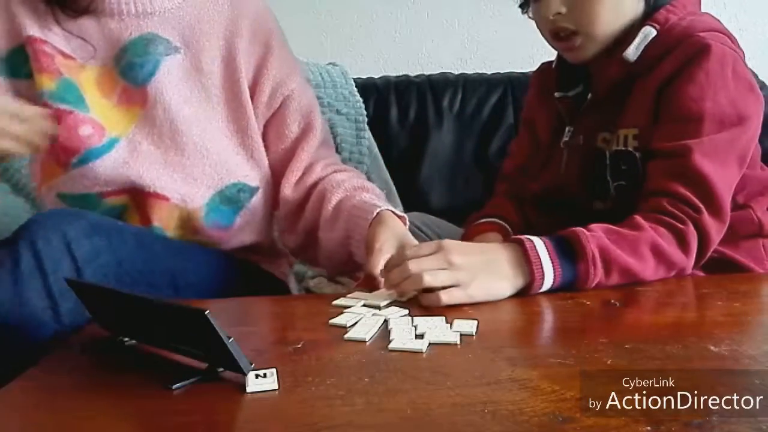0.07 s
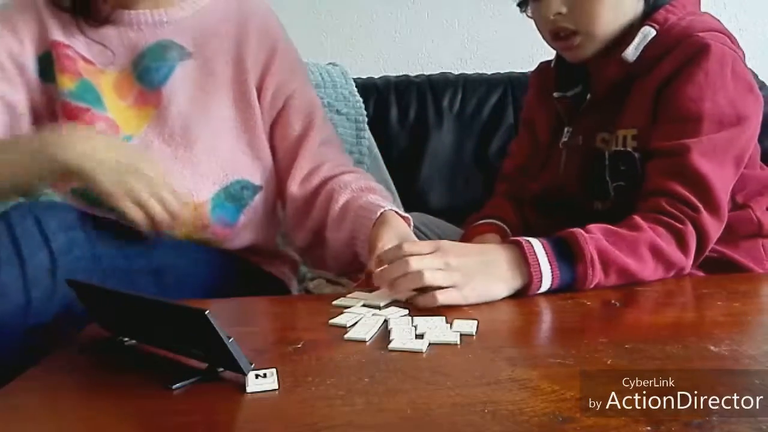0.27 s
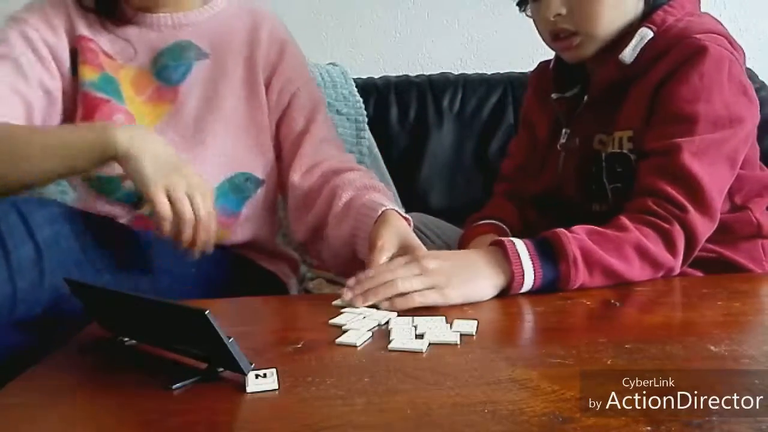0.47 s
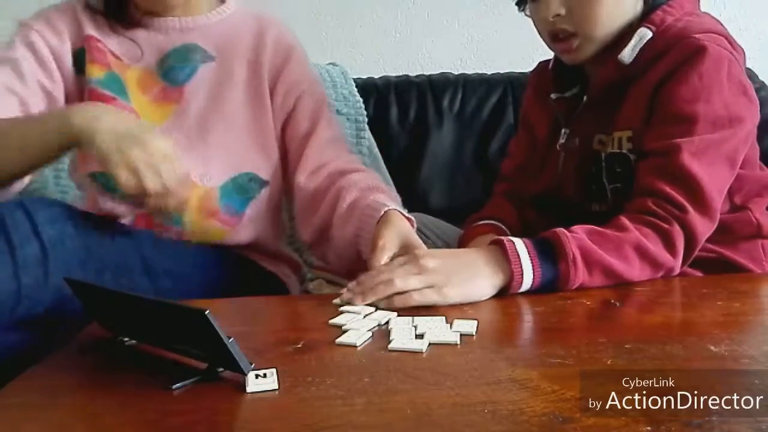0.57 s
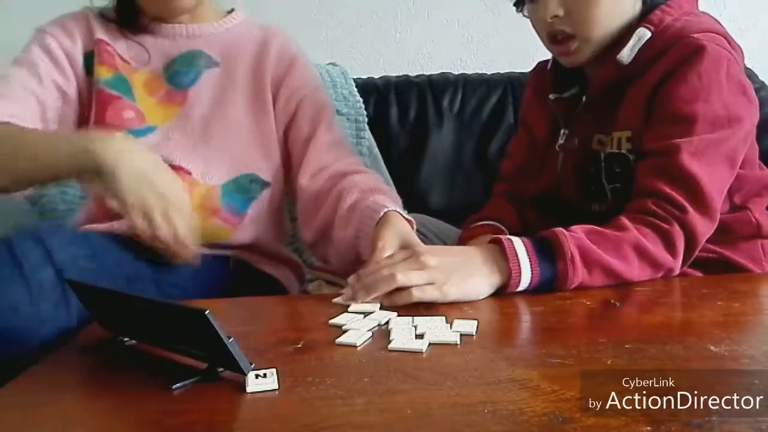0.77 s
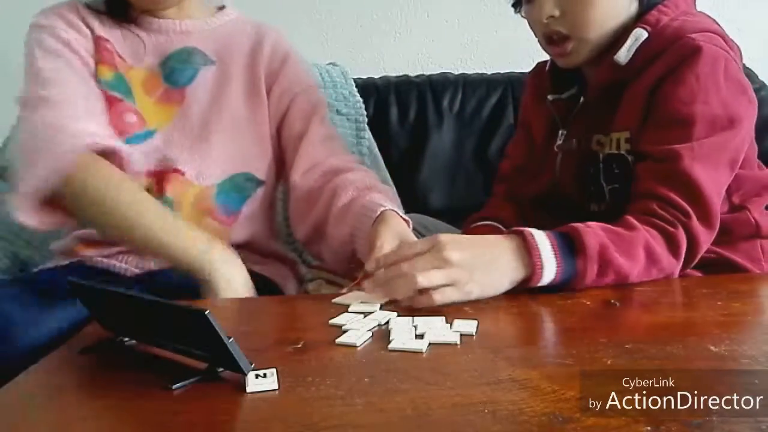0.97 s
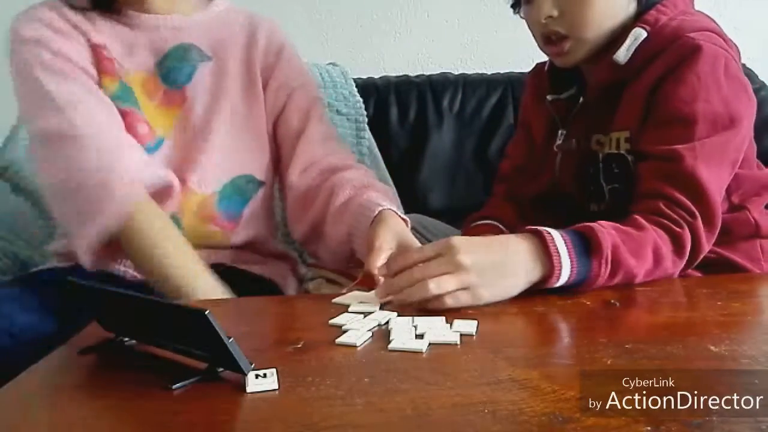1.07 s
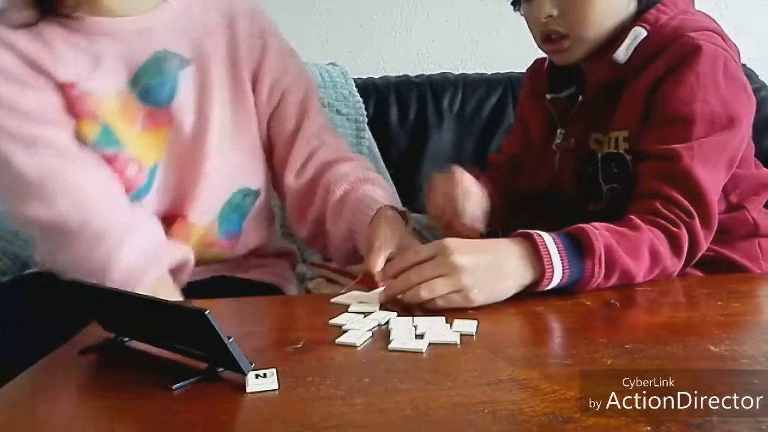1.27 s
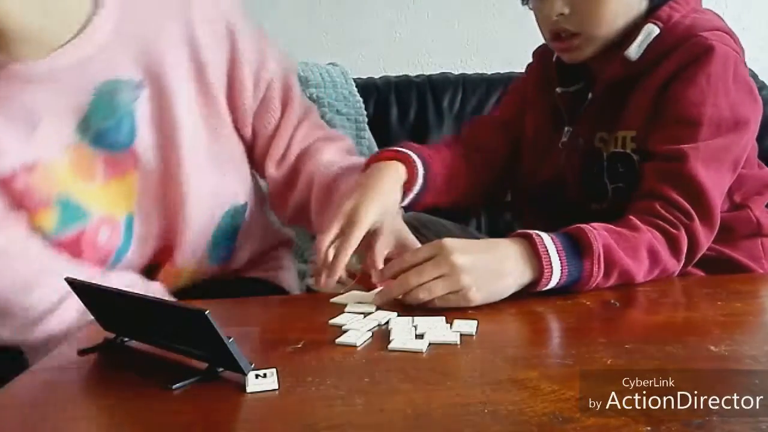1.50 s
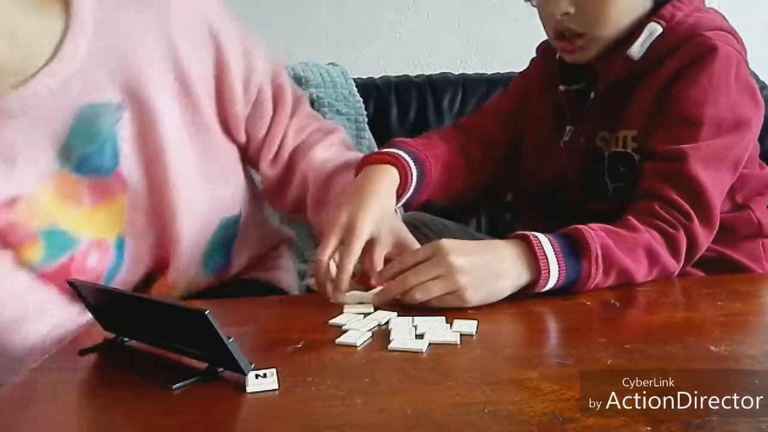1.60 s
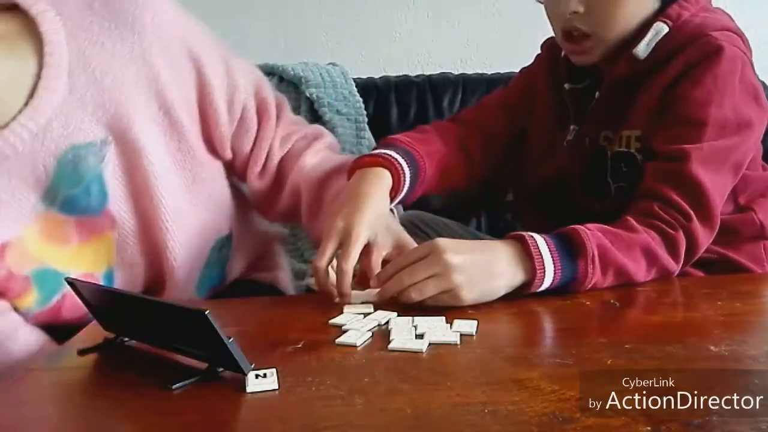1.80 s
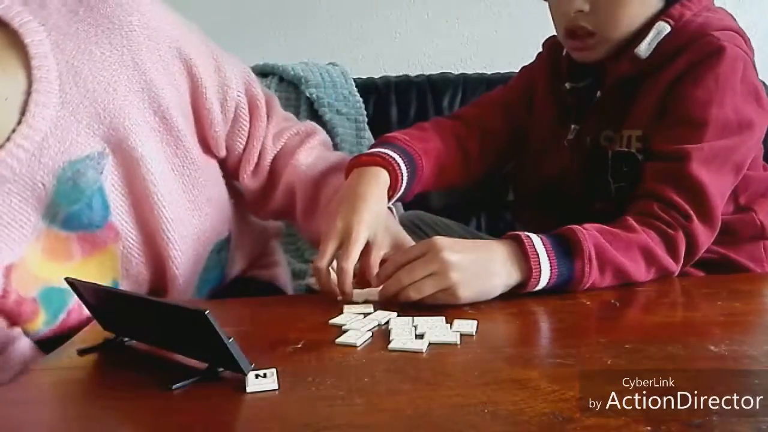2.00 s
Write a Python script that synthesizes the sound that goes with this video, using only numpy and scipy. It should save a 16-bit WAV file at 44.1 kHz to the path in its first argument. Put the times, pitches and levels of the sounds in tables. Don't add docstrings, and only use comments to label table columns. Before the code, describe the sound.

A plastic game tile is knocked down and slid on a wooden table: after a faint tick and sleeve rub at 0.1 s, sharp clacks and bright stuttering scrape run from 0.25 to 0.45 s with a short woody knock, and a last click at 0.5. Soft cloth rustles follow at 0.65-0.95, then from 1.1 to 2 quiet hand thuds, rubs and small tile ticks. Close stereo, small quiet room, faint hiss.

```python
import sys
import numpy as np
from scipy import signal
from scipy.fft import rfft, irfft
from scipy.io import wavfile
from scipy.ndimage import uniform_filter1d

SR = 44100
rng = np.random.default_rng(int(sys.argv[2]) if len(sys.argv) > 2 else 0)


def decibels_to_gain(level_db):
    exponent = np.asarray(level_db, float) / 20
    return 10 ** exponent


def waveform_to_disk(signal):
    frames = np.transpose(np.atleast_2d(signal))
    scaled = np.clip(frames, -1, 1) * 32767
    samples = np.round(scaled).astype(np.int16)
    wavfile.write(sys.argv[1], SR, samples)


N = 90404
T = np.arange(N) / SR


def unit(x):
    return x / np.sqrt(np.mean(x ** 2))


def butter(x, order, hz, kind="low"):
    return signal.sosfilt(signal.butter(order, hz, kind, fs=SR, output="sos"), x)


def smooth_low(x, order, hz):
    return signal.sosfiltfilt(signal.butter(order, hz, fs=SR, output="sos"), x)


def colour(x, points):
    hz, db = np.array(points).T
    bins_hz = np.arange(1, 1026) * SR / 2048
    cepstrum = irfft(np.interp(np.log(bins_hz), np.log(hz), db) * np.log(10) / 20)
    cepstrum[1:1024] *= 2
    cepstrum[1025:] = 0
    impulse = irfft(np.exp(rfft(cepstrum)))[:1024]
    return signal.fftconvolve(x, np.atleast_2d(impulse), axes=-1)[:, :N]


def mode(x, hz, t60_s):
    pole = np.exp((2j * np.pi * hz - np.log(1000) / t60_s) / SR)
    return signal.lfilter([1], [1, -pole], x).imag


def side(pan_db):
    return decibels_to_gain(np.array([[pan_db], [-pan_db]]) / 2)


def ports(x, pan_db):
    lag_s, size = 7.5e-5, 2 ** 17
    bins_hz = np.arange(size // 2 + 1) * SR / size
    late = irfft(rfft(x, size) * np.exp(-2j * np.pi * bins_hz * lag_s))[:N]
    return np.array([late, x]) * side(pan_db)


def grains(per_s, spread_db, channels):
    when, sign, size = rng.random((3, channels, N))
    return unit((when < per_s / SR) * np.sign(sign - .5) * decibels_to_gain(-spread_db * np.log(1 - size)))


def curve(rows, index):
    return np.interp(T, [r[0] for r in rows], [r[index] for r in rows], -120, -120)


def burst(s, length_s, noise):
    peak_s = s + length_s
    return noise * np.exp(-np.abs(T - peak_s) / np.where(T < peak_s, length_s / 3, length_s))


def tile():
    # (time [s], peak [dB], left-right [dB], length [s])
    knocks = [(0.2465, -21.5, -8.5, 0.0025), (0.2481, -31.5, -7, 0.0025), (0.265, -32, 1, 0.0045),
              (0.2909, -22, -6.5, 0.0016), (0.3033, -23.5, -1, 0.0017), (0.3083, -29.5, 9, 0.0019),
              (0.3165, -36, 11, 0.0016), (0.328, -28, -7, 0.0017), (0.3363, -23.5, -2, 0.0029),
              (0.349, -33, 0, 0.0022), (0.358, -28, 6, 0.001), (0.3751, -21.5, 1.7, 0.0018),
              (0.384, -22, 1.5, 0.0012), (0.3926, -27, -3.5, 0.003), (0.407, -32, -4, 0.0023),
              (0.416, -29, -4.5, 0.0018), (0.4405, -33, -2.5, 0.003), (0.4885, -52, -4, 0.0008),
              (0.502, -49, 3, 0.0014)]
    # (time [s], pressure [dB], drag on the wood [dB])
    slide = [(.19, -62.5, -71), (.247, -69, -84), (.255, -43, -52), (.285, -39.5, -54.5), (.32, -32, -46),
             (.4, -33, -60), (.425, -37, -62), (.46, -39.5, -62.5), (.53, -52.5, -62.5), (.6, -88, -78.5)]
    # (frequency [Hz], level [dB], t60 [s], left-right [dB])
    tile_modes = [(3720, -15, 0.042, 11.5), (4270, -13.5, 0.017, 11.5), (5447, -0.5, 0.055, 10),
                  (6458, 6.5, 0.065, 6), (7360, -15, 0.049, -17.5), (9700, -4.5, 0.0018, -18),
                  (13050, -4.5, 0.0096, -2), (13170, -4, 0.014, -7)]
    # (frequency [Hz], level [dB])
    scrape = [(1500, -71.5), (3000, -18.5), (4500, -8), (6300, 5.5), (9000, -5), (11800, -21.5), (13100, 0),
              (13900, -27.5), (15000, -28.5)]
    # (frequency [Hz], level [dB])
    drag = [(150, -14), (500, -0.5), (1400, 11), (3000, 6.5), (5000, -23)]
    stutter_per_s, stutter_db = 200, 1.5
    chatter_db, scrape_db, knock_db, crack_db = 0.5, 0.5, 6.5, 2.5
    t60_cap_s, flips_hz = .024, 10000
    dulls_db_per_db = 5.8

    hold = int(SR / stutter_per_s)
    steps = np.repeat(rng.standard_normal(N // 50), hold)[:N]
    stutter = decibels_to_gain(stutter_db * uniform_filter1d(steps, hold // 2))
    chatter = grains(per_s=4500, spread_db=2.5, channels=3)
    noise = ports(rng.standard_normal(N), 0)

    def ring(x):
        out = 0
        for hz, db, t60_s, pan_db in tile_modes:
            lobes = np.sign([[1], [flips_hz - hz]])
            out = out + decibels_to_gain(db) * side(pan_db) * lobes * mode(x, hz, min(t60_s, t60_cap_s))
        return out

    hits = sum(decibels_to_gain(db) * side(pan_db) * burst(s, length_s, noise) for s, db, pan_db, length_s in knocks)

    rough = ports(chatter[0], 0) + 1.15 * chatter[1:]
    pressure_db = curve(slide, index=1)
    slid = rough * decibels_to_gain(pressure_db) * stutter
    dull = smooth_low(slid, 2, 9000)
    slid = dull + (slid - dull) * decibels_to_gain(dulls_db_per_db * (pressure_db - pressure_db.max()))

    rings = ring(slid * decibels_to_gain(chatter_db) + hits * decibels_to_gain(knock_db)) / np.std(ring(noise))
    rings = butter(rings, 3, 3000, "high")
    broad = colour(slid * decibels_to_gain(scrape_db) + hits * decibels_to_gain(crack_db), scrape) / np.std(colour(noise, scrape))
    wood = unit(colour(rough, drag)) * decibels_to_gain(curve(slide, index=2)) * stutter[::-1]
    return rings + broad + wood


def table():
    # (frequency [Hz], level [dB], t60 [s], left-right unlikeness [ratio])
    table_modes = [(166.3, -17, 0.17, -0.14), (207, 0.5, 0.11, -0.18), (300, -5, 0.042, 0.27),
                   (504, -11.5, 0.037, 1.1), (820, -19, 0.0065, -0.7), (1340, -6, 0.022, 0.018)]
    # (time [s], peak [dB])
    pushes = [
        (.248, -22),
        (.251, -29.5),
        (.27, -27.5),
        (.294, -25),
        (.311, -28),
        (0.33, -35),
    ]
    push_db, hum_db, hum_end_s, hum_fade_s = -15, -53.5, 0.448, 0.021
    x = np.zeros(N)
    for s, db in pushes:
        x[int(s * SR)] = decibels_to_gain(db + push_db)
    hum = unit(mode(mode(rng.standard_normal(N), 212.5, 0.12), 272, 0.011))
    hum = hum * np.clip(np.minimum(T - pushes[0][0], hum_end_s - T) / hum_fade_s, 0, 1)
    out = decibels_to_gain(hum_db) * hum
    for hz, db, t60_s, unlike in table_modes:
        out = out + decibels_to_gain(db) * (1 + unlike * np.array([[1], [-1]])) * mode(x, hz, t60_s)
    return out


def ticks():
    # (time [s], peak [dB], frequency [Hz], t60 [s])
    tick_events = [(0.248, -39, 817, 0.0037), (.097, -41.5, 6960, 0.016), (0.096, -50.5, 4440, 0.0094),
                   (.111, -50, 6270, 0.023), (0.605, -61.5, 1845, 0.04), (1.125, -54, 1260, 0.028),
                   (1.366, -53.5, 1630, 0.013), (1.365, -62.5, 2900, 0.0091), (1.384, -66, 852, 0.09),
                   (1.512, -58, 1450, 0.031), (1.637, -43.5, 7190, 0.017), (1.638, -42.5, 12300, 0.0061),
                   (1.703, -43, 1160, 0.019), (1.713, -50.5, 1300, 0.01), (1.771, -42, 6290, 0.02),
                   (1.772, -48, 5440, 0.021), (1.771, -52.5, 3640, 0.016), (1.771, -51.5, 2456, 0.02),
                   (1.783, -65.5, 6000, 0.011), (0.4957, -37, 6330, 0.017), (1.868, -46.5, 1360, 0.0079),
                   (1.949, -55, 1180, 0.039), (2.014, -49, 4850, 0.0035), (2.044, -45, 930, 0.0063)]
    crack_db = 3.5
    noise, out = rng.standard_normal(N), 0
    for s, db, hz, t60_s in tick_events:
        u = np.clip(T - s, 0, None)
        ring = np.sin(2 * np.pi * hz * u) * decibels_to_gain(-60 * u / t60_s) * (1 - np.exp(-u / 0.0024)) * 2
        crack = mode(mode(burst(s, 0.0014, noise), hz, 8 / hz), hz, 8 / hz)
        crack = np.gradient(np.gradient(crack)) * 0.11 * np.sqrt(SR / hz) * 0.61
        out = out + decibels_to_gain(db) * (ring + decibels_to_gain(crack_db) * crack)
    return np.array([np.roll(out, 1), out])


def scuffs():
    # (start [s], length [s], level [dB], frequency [Hz], width [Hz])
    scuff_events = [(.088, 0.025, -70.5, 1760, 250), (.09, 0.048, -71, 1110, 304),
                    (0.131, 0.024, -66, 700, 200), (.148, 0.015, -60, 1430, 790),
                    (0.149, .008, -67, 3600, 500), (0.155, 0.041, -58.5, 520, 197),
                    (.178, 0.024, -57.5, 526, 297), (0.176, 0.014, -56, 1170, 250),
                    (0.179, 0.027, -67, 2000, 350), (.267, 0.011, -40.5, 1520, 899),
                    (0.298, 0.029, -59, 646, 500), (0.481, 0.031, -63, 268, 147),
                    (0.4976, 0.0035, -34, 5160, 2400), (0.69, 0.0073, -55.5, 4330, 2440),
                    (0.736, 0.21, -62.5, 1320, 700), (0.346, 0.094, -55.5, 1460, 500),
                    (0.246, 0.012, -46, 1460, 2000), (.298, 0.017, -45.5, 1700, 1500),
                    (1.118, .03, -65, 686, 503), (1.772, 0.0059, -53.5, 2640, 3000),
                    (1.868, 0.0053, -62.5, 1500, 1200), (2.04, 0.01, -66, 1800, 1500),
                    (1.509, 0.1, -67, 550, 118), (1.647, 0.098, -64, 290, 119), (1.86, .06, -64, 1440, 600),
                    (1.915, 0.053, -74, 2450, 604), (1.95, 0.02, -63, 1500, 905),
                    (1.964, 0.087, -62, 580, 235), (1.978, 0.039, -64, 1300, 350),
                    (1.993, 0.028, -64, 1830, 300), (1.996, 0.027, -65.5, 2730, 400)]
    g = grains(per_s=3000, spread_db=4.9, channels=3)
    rough = g[0] + 0.7 * g[1:]
    out = np.zeros((2, N))
    for s, length_s, db, hz, width_hz in scuff_events:
        a, b = int(s * SR), min(int((s + length_s) * SR), N)
        t60_s = 2.2 / width_hz
        x = np.diff(rough[:, a - 2001:b])
        rung = mode(mode(x, hz, t60_s), hz, t60_s)[:, 2000:]
        out[:, a:b] += decibels_to_gain(db) * unit(rung) * np.sin(np.pi * np.linspace(0, 1, b - a) ** 0.62)
    return out


def rubs():
    # (start [s], rise [s], hold [s], fall [s], level [dB])
    rub_events = [
        (0.083, 0.0047, 0.0095, 0.029, -62.5),
        (0.127, 0.024, 0.14, 0.033, -61),
        (0.637, 0.088, 0.047, 0.093, -55),
        (0.741, 0.025, 0.12, 0.068, -57),
        (1.021, 0.059, 0.072, 0.094, -62),
        (1.344, 0.0092, 0.031, 0.1, -69.5),
        (1.494, 0.022, 0.037, 0.2, -53),
        (1.828, 0.062, 0.13, 0.026, -78),
    ]
    # (tilt [dB], left-right [dB])
    rub_colours = [(-6.5, 6), (-5.5, 1.5), (0, 1.5), (-6, 6), (-2.5, 5), (-4, 1.5), (-1.5, 0.5), (-14.5, 3)]
    # (frequency [Hz], level [dB])
    cloth_spectrum = [(200, -40), (500, -15), (1300, -5.5), (2200, -6.5), (5200, -0.5), (8500, -8),
                      (10500, -13.5), (13000, -61)]
    # (frequency [Hz], level [dB], t60 [s])
    rub_modes = [(1400, -7, .03), (2300, -9, .02), (2950, -7, .025), (4700, -7, .02), (6000, -7, .025)]
    range_db, hands_on_tiles_s = 19, 1.3
    bounce_s, bounce_db = 0.00014, -15

    g = grains(per_s=9000, spread_db=3, channels=3)
    cloth = unit(colour(ports(g[0], 0) + 3.9 * g[1:], cloth_spectrum))
    cloth = cloth + decibels_to_gain(bounce_db) * np.array([np.interp(T - bounce_s, T, c) for c in cloth])
    rung = sum(decibels_to_gain(db) * unit(mode(mode(cloth, hz, t60_s), hz, t60_s / 2)) for hz, db, t60_s in rub_modes)
    cloth = cloth + (T > hands_on_tiles_s) * rung
    low = smooth_low(cloth, 1, 2600)
    out = 0
    for (s, rise_s, hold_s, fall_s, db), (tilt_db, pan_db) in zip(rub_events, rub_colours):
        end_s = s + rise_s + hold_s + fall_s
        shape = np.clip(np.minimum((T - s) / rise_s, (end_s - T) / fall_s), -2, 1)
        tilted = low * decibels_to_gain(-tilt_db) + (cloth - low) * decibels_to_gain(tilt_db)
        out = out + decibels_to_gain(db + range_db * (shape - 1)) * side(pan_db) * tilted
    return out


def thuds():
    # (time [s], peak [dB], frequency [Hz], length [s])
    thud_events = [(0.705, -62.5, 324, 0.015), (1.122, -54, 100, 0.029), (1.126, -55, 234, 0.014),
                   (1.368, -53.5, 123, 0.026), (1.391, -54, 248, 0.015), (1.405, -48.5, 110, 0.023),
                   (1.517, -52.5, 96.4, 0.044), (1.555, -56, 100.7, 0.12), (1.552, -52, 210, 0.01),
                   (1.6, -48.5, 181, 0.017), (1.646, -60, 285, 0.018), (1.667, -60.5, 95, 0.091),
                   (1.726, -56, 140, 0.02), (1.786, -49, 102, 0.026), (1.868, -50.5, 111.5, 0.044),
                   (1.876, -56, 204, 0.018), (1.907, -52, 114.6, 0.052), (1.971, -52.5, 171, 0.019),
                   (1.99, -58, 70.3, 0.077)]
    roughness = 0.25
    skin = unit(butter(rng.standard_normal((2, N)), 2, [60, 400], "band"))
    swings = 0
    for s, db, hz, length_s in thud_events:
        v = np.clip((T - s) / length_s, 0, 1)
        swings = swings + decibels_to_gain(db) * np.sin(2 * np.pi * hz * v * length_s) * np.sin(np.pi * np.sqrt(v))
    return (1 + roughness * (skin + skin[0]) / 2) * swings


def air():
    # (frequency [Hz], level [dB])
    air_spectrum = [(18, -45), (30, -38), (92, -2), (563, -13), (641, -13), (2170, -15.5), (2410, -17),
                    (7160, -15.5), (14800, -22)]
    # (frequency [Hz], level [dB])
    whines = [(6958, -80.5), (7016, -83.5)]
    air_db, alike_hz = -68.5, 324
    n = rng.standard_normal((3, N))
    low = butter(n[0], 2, alike_hz)
    high = butter(n[1:], 2, alike_hz, "high")
    whine = sum(decibels_to_gain(db - 1.5) * np.sin(2 * np.pi * hz * T) for hz, db in whines)
    return unit(colour(low + high, air_spectrum)) * decibels_to_gain(air_db) + whine


def room(x):
    t60_s, gap_s = .22, .003
    t = T[:SR // 2]
    tail = rng.standard_normal((2, len(t))) * decibels_to_gain(-60 * t / t60_s) * (t > gap_s)
    return signal.fftconvolve(x, tail / np.sqrt(np.sum(tail ** 2) / 2), axes=-1)[:, :N]


def scene():
    room_db, wood_room_db = -10, -6
    near = tile() + ticks() + rubs() + scuffs()
    wood = table() + thuds()
    return near + wood + decibels_to_gain(room_db) * room(near + decibels_to_gain(wood_room_db) * wood) + air()


def mute_bands(x):
    gap_db, rare, often, faint_top_hz = -22, 1.85, .85, 9800
    f, _, z = signal.stft(x, SR, nperseg=1024)
    hz = f[:, None]
    power = uniform_filter1d(np.mean(np.abs(z) ** 2, axis=0), size=8, axis=0)
    faint = (hz > faint_top_hz) & (power < 4 * np.median(power, axis=1, keepdims=True))
    chance = uniform_filter1d(rng.standard_normal(power.shape), size=3, axis=0)
    chance = unit(uniform_filter1d(chance, size=4, axis=1))
    gaps = (chance > np.where(faint, often, rare)) & (hz > 800)
    return signal.istft(z * np.where(gaps, decibels_to_gain(gap_db), 1), SR, nperseg=1024)[1][:, :N]


def roll_off(x):
    return signal.sosfilt(signal.butter(12, 15100, fs=SR, output="sos"), x)


def record(dry):
    x = butter(dry, 3, 62, "high")
    x = signal.sosfilt(signal.ellip(8, 1, 70, 14350, fs=SR, output="sos"), x)
    return roll_off(mute_bands(x))


dry = scene()
out = record(dry)
waveform_to_disk(out)
```